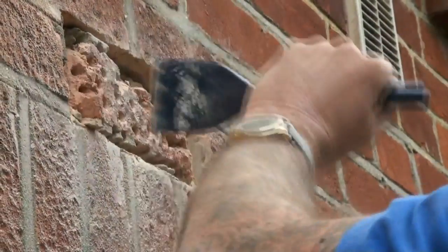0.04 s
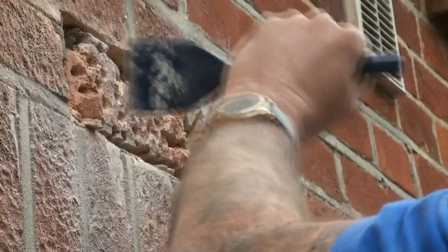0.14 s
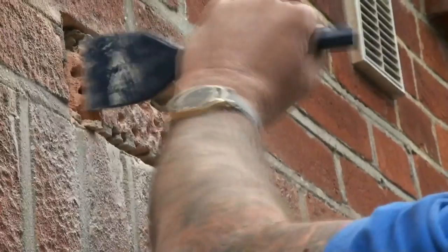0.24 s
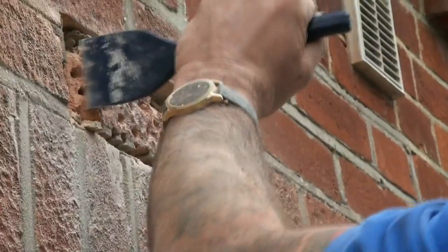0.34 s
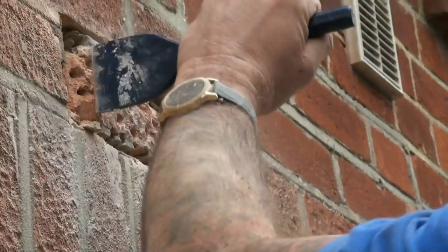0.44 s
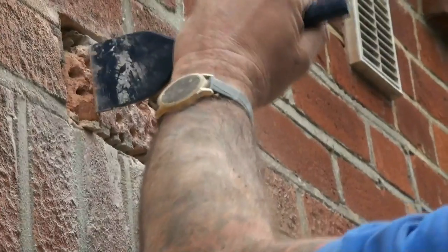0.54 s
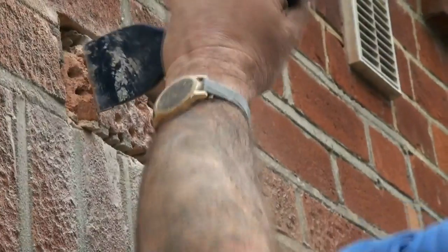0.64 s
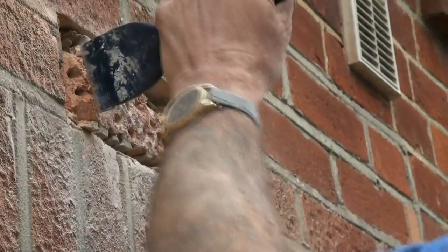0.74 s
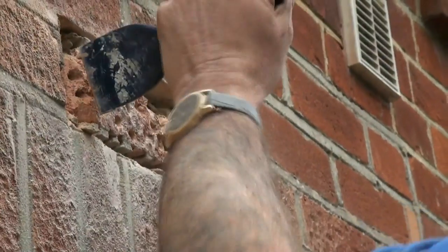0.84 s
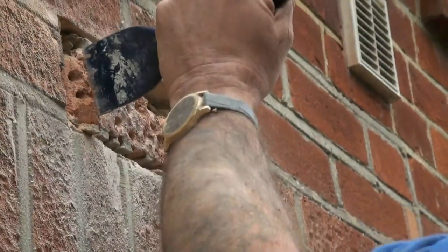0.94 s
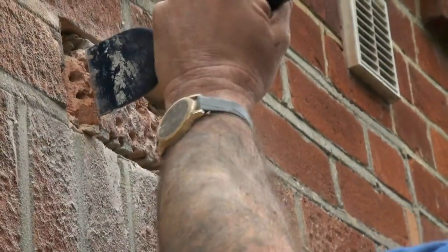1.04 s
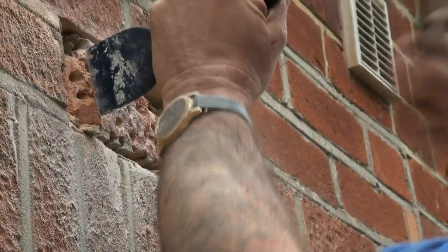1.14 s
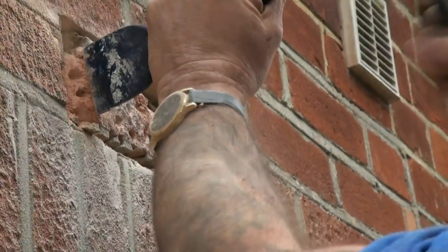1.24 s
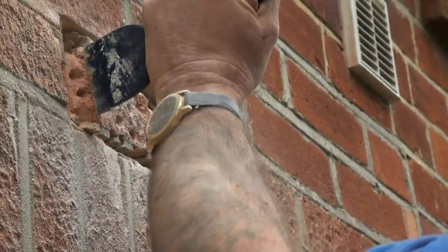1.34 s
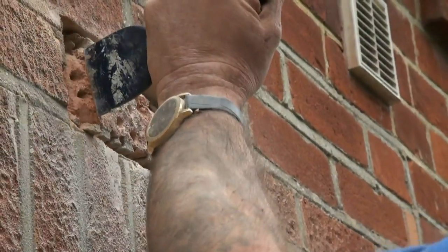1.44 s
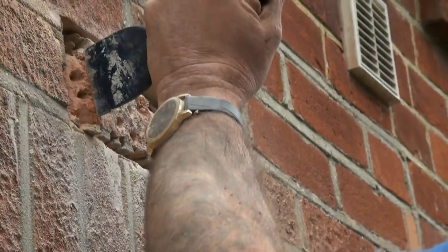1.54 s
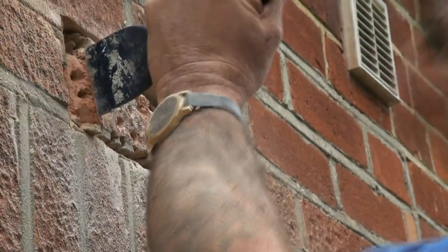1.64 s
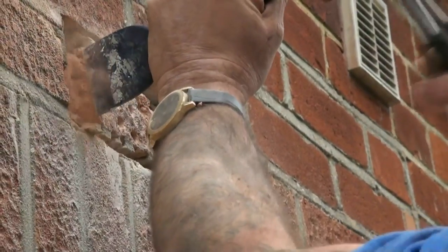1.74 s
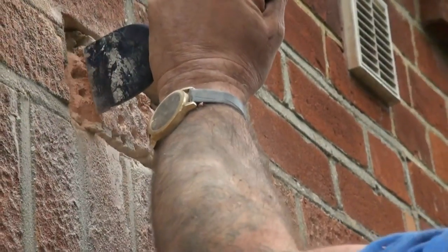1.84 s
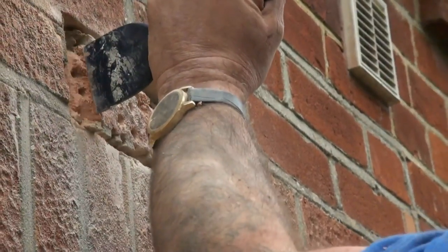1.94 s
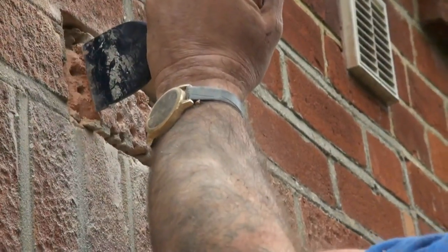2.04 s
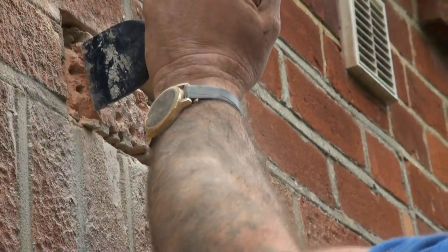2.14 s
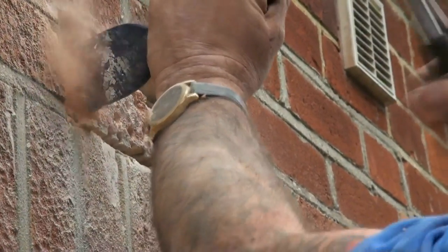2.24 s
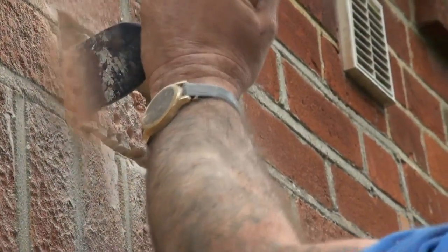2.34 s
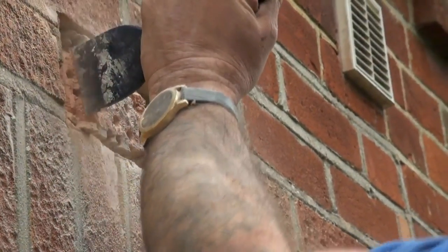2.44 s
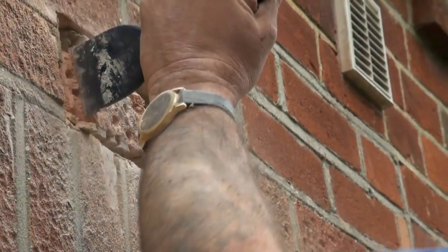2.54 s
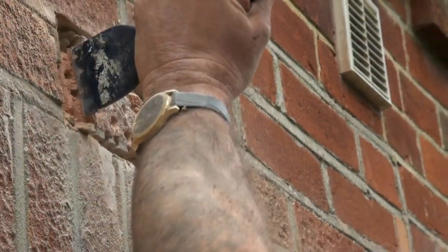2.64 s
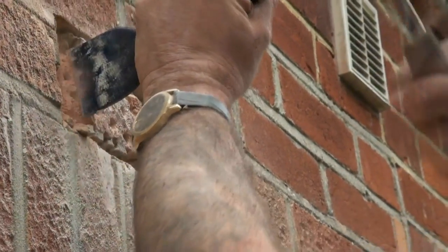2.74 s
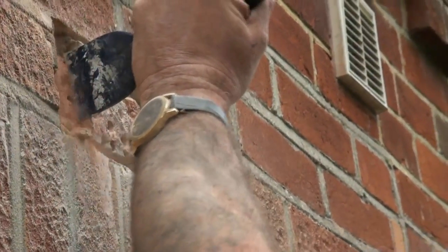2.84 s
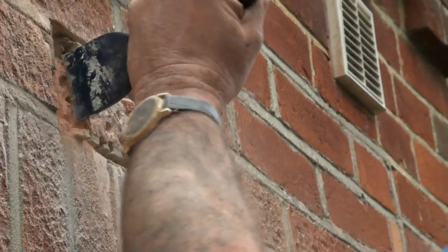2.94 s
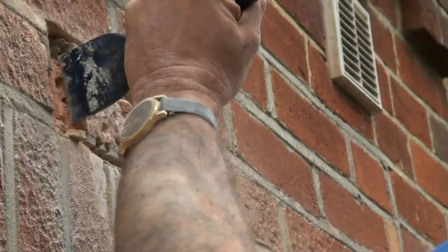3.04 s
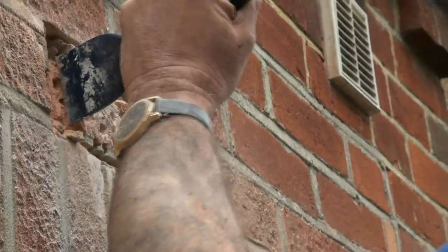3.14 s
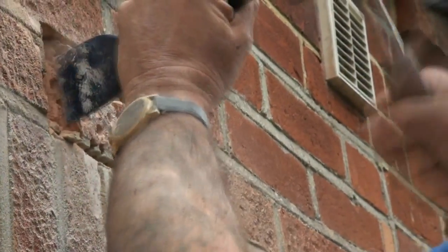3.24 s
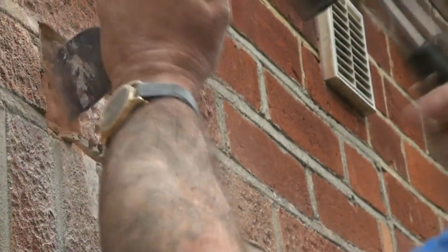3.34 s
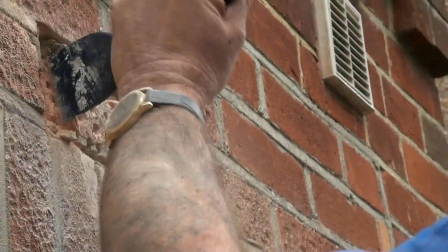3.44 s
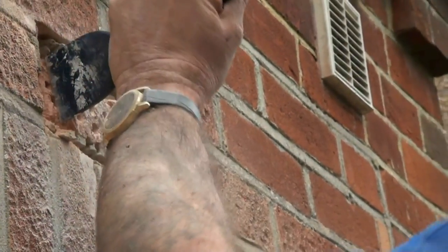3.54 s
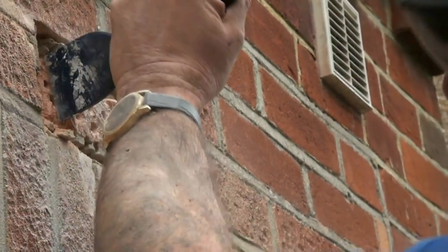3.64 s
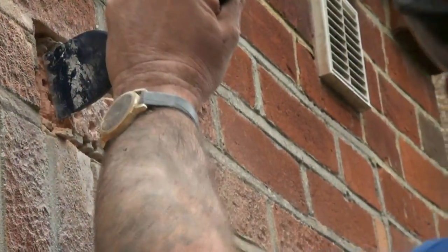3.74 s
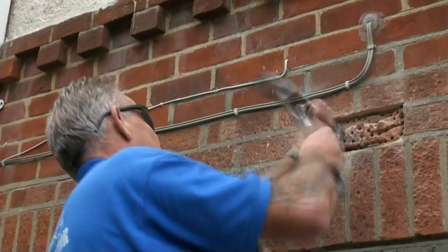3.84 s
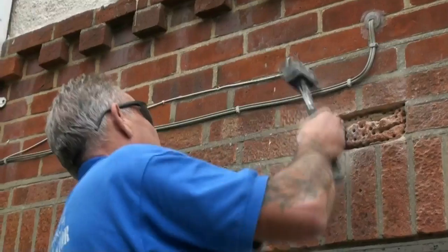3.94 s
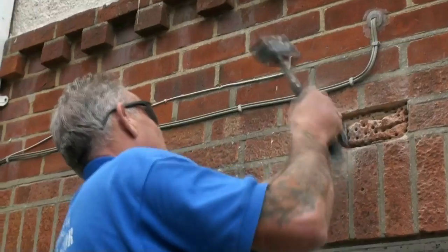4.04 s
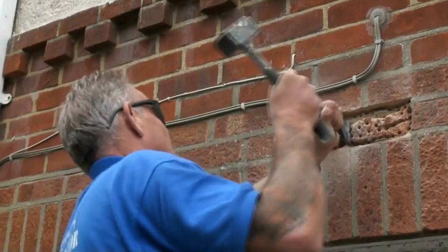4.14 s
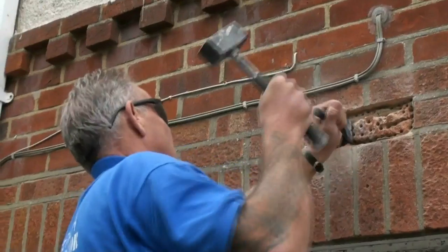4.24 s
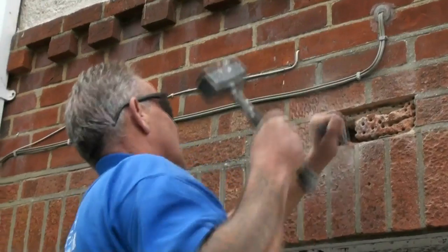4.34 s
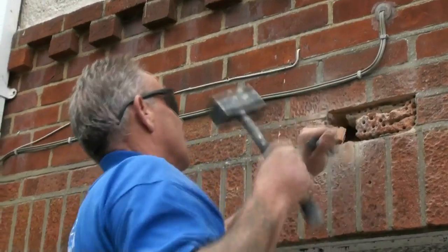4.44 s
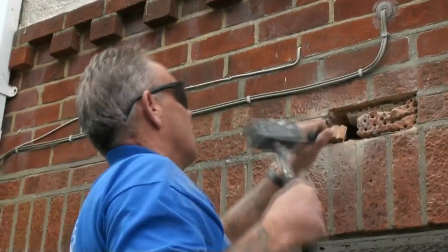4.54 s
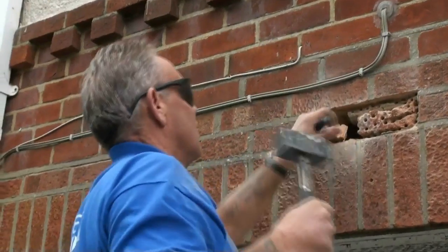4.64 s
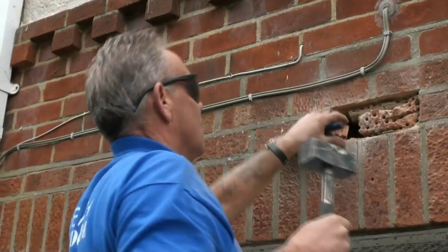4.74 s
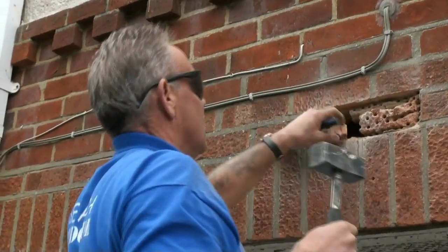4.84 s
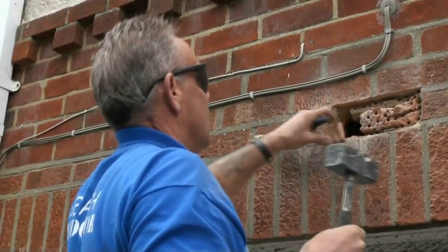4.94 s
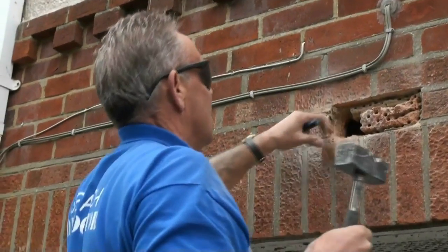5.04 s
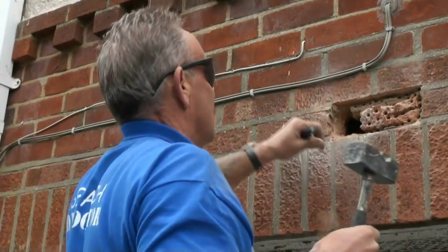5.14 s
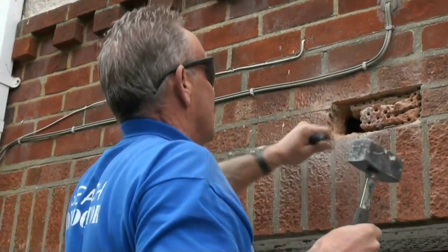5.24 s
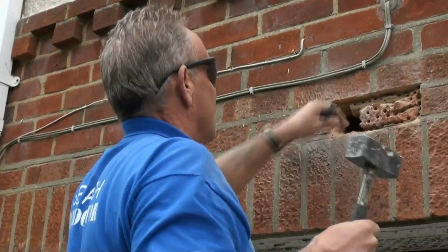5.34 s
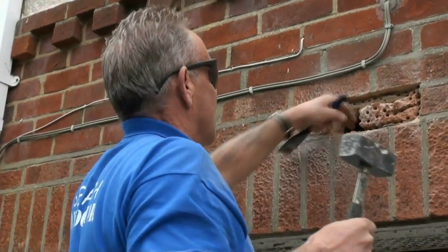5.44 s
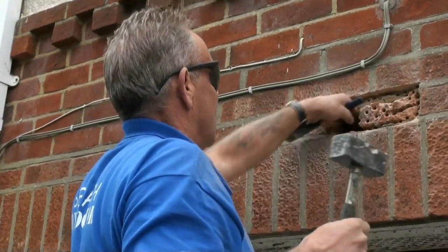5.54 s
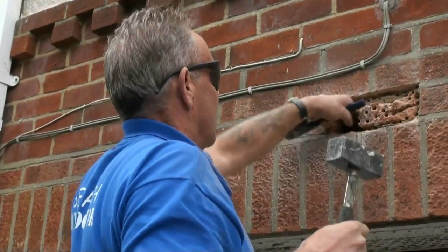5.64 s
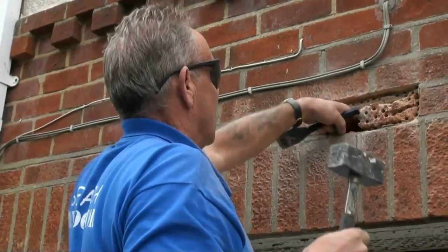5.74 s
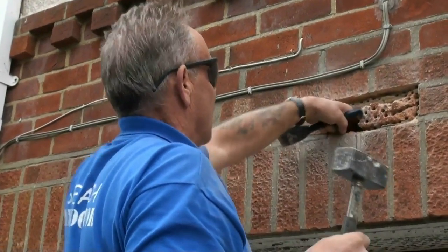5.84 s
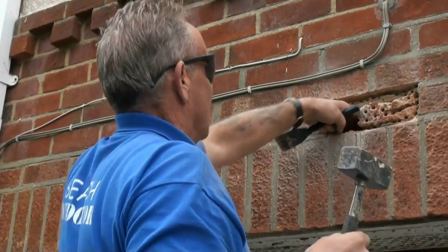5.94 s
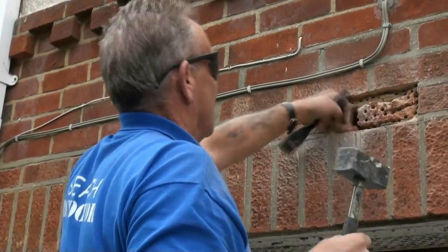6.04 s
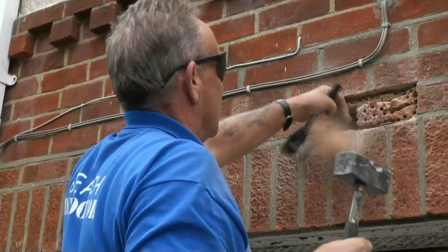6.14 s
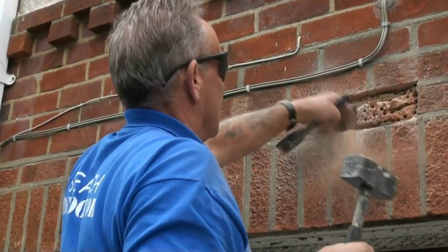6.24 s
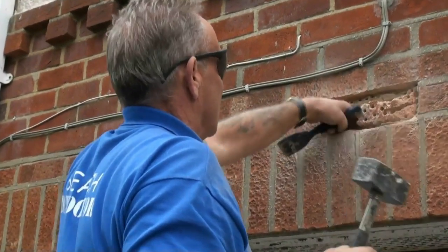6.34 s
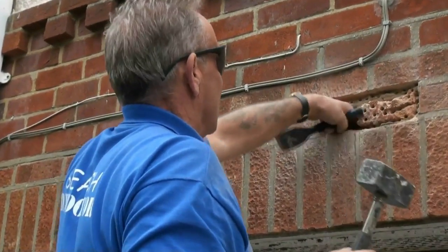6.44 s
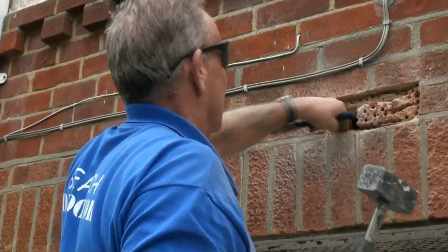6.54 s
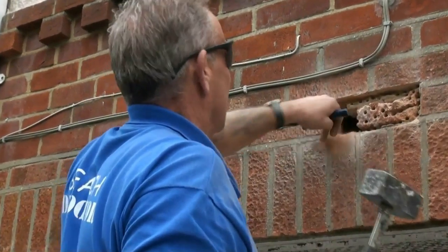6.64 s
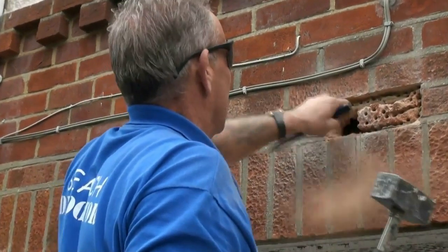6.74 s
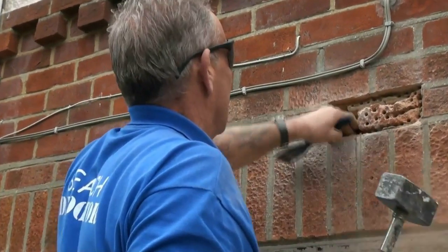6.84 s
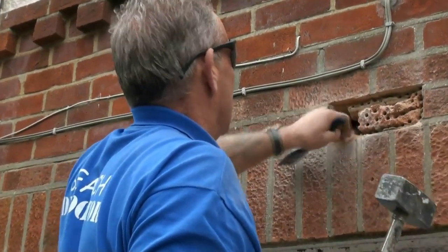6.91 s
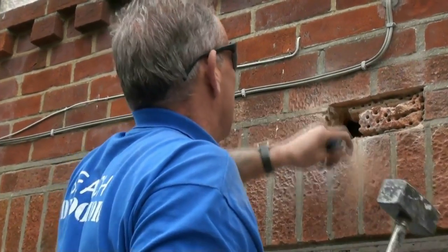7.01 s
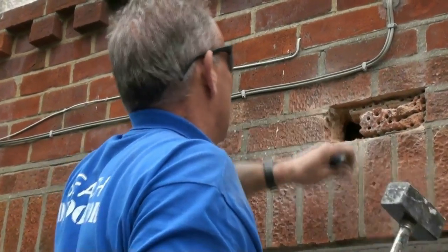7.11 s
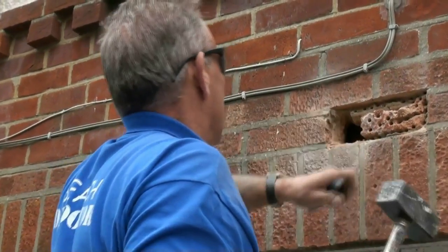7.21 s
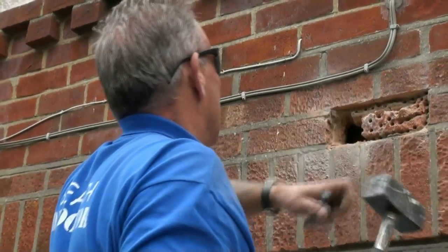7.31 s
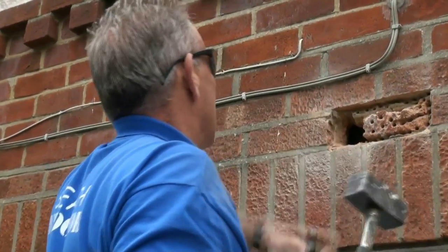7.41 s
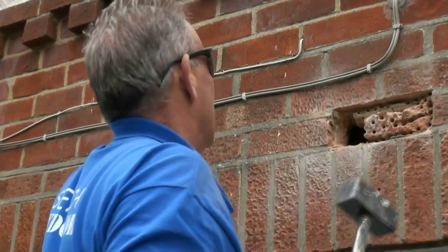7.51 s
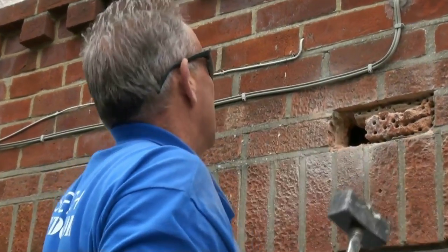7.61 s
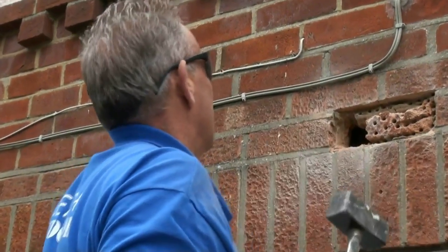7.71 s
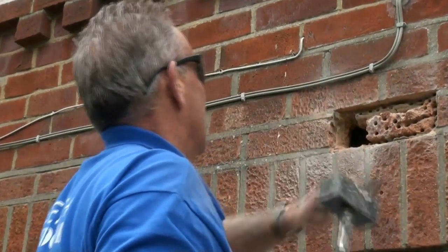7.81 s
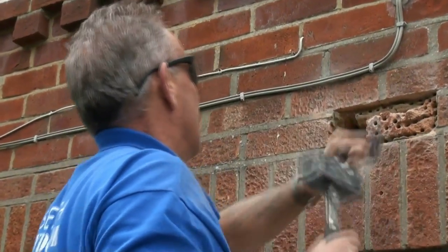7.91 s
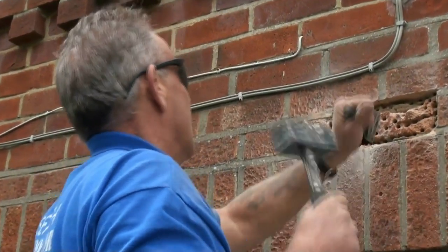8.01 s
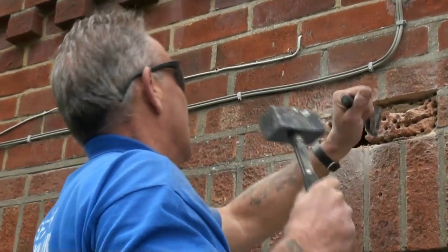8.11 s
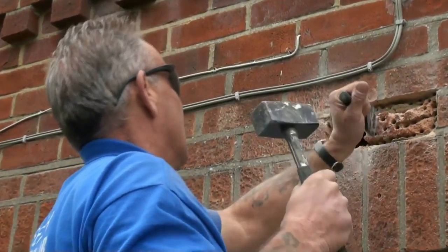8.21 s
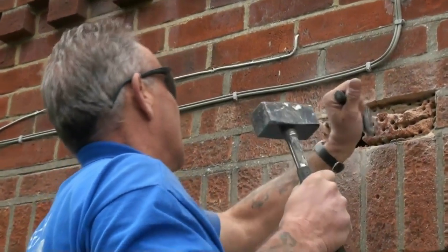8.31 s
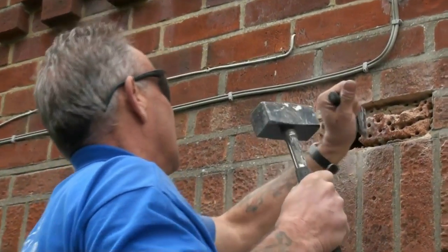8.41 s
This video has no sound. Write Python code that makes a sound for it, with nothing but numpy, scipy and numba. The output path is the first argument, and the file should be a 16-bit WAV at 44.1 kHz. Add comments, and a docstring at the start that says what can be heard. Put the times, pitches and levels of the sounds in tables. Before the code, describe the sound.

A brick yard with faint distant traffic, low wind and a weak engine drone, heard through a small stereo camera microphone. From 0.3 to 1.0 s a steel blade touches and scrapes brick with small dry knocks. Heavy hammer blows on a steel chisel fall at about 1.2, 1.7, 2.3, 2.8, 3.3 and 3.85 s: hard cracks, bright wavering steel ring, low wall boom, crumbling brick and trickling grit, squashed by a limiter. At 3.87 s a pop and momentary dropout cut the last blow; sound returns at 3.9 s with a thinner, brighter metallic ring. Chips patter from 4.1 to 5.7 s, then rubble spills and a lump lands at 5.8 s with a long hollow thud. After a lull, crunchy rubble pours at 6.8 s with a thin steel clink, and again at 7.3 s under a wind swell. It thins to sparse ticks and a dull knock at 8.25 s.

```python
"""In a yard, a club hammer drives a steel bolster into a brick wall: steel rings (wavering sine waves),
the wall booms (low, slower ones) and brick crumbles (filtered random clicks). Then rubble is raked out
and drops: chips are short filtered noise, and one lump lands with a long thud. Far traffic and wind are
shaped noise, an engine a gliding sine. A small camera microphone with a hard limiter listens;
midway the sound pops and drops out for a moment."""
import sys
import numpy as np
from scipy import signal
from scipy.fft import rfft, irfft
from scipy.io import wavfile
from scipy.ndimage import uniform_filter1d, minimum_filter1d
from numba import njit

SR = 44100
rng = np.random.default_rng(int(sys.argv[2]) if len(sys.argv) > 2 else 0)


def wav_record(signal):
    """Record a signal, one row per channel, as 16-bit PCM in the file named by sys.argv[1]."""
    frames = np.transpose(np.atleast_2d(signal))
    bounded = np.clip(frames, -1, 1)
    # unit amplitude maps onto the largest positive 16-bit level
    quanta = np.round(bounded * 32767).astype(np.int16)
    wavfile.write(sys.argv[1], SR, quanta)


N = 373527
T = np.arange(N) / SR  # time in seconds

# Hammer blows. Each row: start in seconds, strength in dB, wall boom in dB, shaft ring in dB,
# head ring in dB, extra crunch above 1 kHz in dB, freest shaft pitch in Hz,
# left minus right in dB, level of the grit knocked loose in dB.
BLOWS = [(1.221, -17.5, -5, -1.5, -15, -0.5, 5500, 2, -54),
         (1.737, -14.5, -3, -1.5, -17.5, 0, 5420, 2, -42.5),
         (2.278, -16.5, -5, -6, -14, 1.5, 5700, 2.2, -44), (2.797, -13, -3, -9, -22.5, 0.5, 5180, 2, -40),
         (3.322, -16.5, -2.5, -9, -24.5, 0, 4860, 1, -43), (3.848, -14, 1, -5.5, -15.5, -1, 5040, 3.5, -60),
         (3.902, -25, -13, 6.5, 2, 9.5, 5800, -1.2, -50)]

POP_S, GAP_S, BACK_S = 3.8740, 3.8779, 3.9012  # seconds: the pop, the dropout, the return
POP_DB, GAP_DB = 12.5, -19  # level change during the pop and the dropout


def undb(db):
    """Turns decibels into a plain multiplier."""
    return 10 ** (np.asarray(db) / 20)


def unit(x):
    """Scales a sound to an average (RMS) level of 1."""
    return x / np.sqrt(np.mean(x ** 2))


def band(x, lo_hz, hi_hz):
    """Keeps mainly the pitches between two limits, along the last axis."""
    sos = signal.butter(2, [lo_hz, min(hi_hz, .45 * SR)], "band", fs=SR, output="sos")
    return signal.sosfilt(sos, x)


def curve(table, column=1):
    """Multiplier over time, read from a dB column of a table whose first column is seconds."""
    table = np.vstack(table)
    return undb(np.interp(T, table[:, 0], table[:, int(column)]))


def fade(t, t60):
    """Steady dying away, down by 60 dB after t60 seconds."""
    return np.exp(-np.log(1000) * t / t60)


def add(out, s, x, pan_db):
    """Mixes one sound into the stereo track at s seconds; pan_db is left minus right."""
    i = int(s * SR)
    x = x[:N - i]
    out[:, i:i + len(x)] += x * undb([[pan_db / 2], [-pan_db / 2]])


def side_db(s):
    """Left minus right in dB: a little left before the dropout, a little right after it."""
    return 1.6 if s < GAP_S else -1.2


def spread(x, width):
    """Stereo from a shared stream and an unrelated stretch of it in opposed phase."""
    return x + width * np.roll(x, len(x) // 3) * np.array([[1], [-1]])


def grains(per_s, spread_db, count):
    """Random clicks of very uneven size, over count samples."""
    chance = rng.random((3, count))
    clicks = chance[0] < per_s / SR
    sign = np.sign(chance[1] - .5)
    size = undb(-spread_db * np.log(1 - chance[2]))
    return unit(clicks * sign * size)


def ring(modes, scatter_db, rough_hz, clean):
    """One strike of a set of ringing pitches; gritty contact makes each waver in size and phase."""
    hz, db, t60 = np.transpose(modes)[..., None]
    t, hold = T[:SR // 2], int(SR / rough_hz)
    # random steps, rough_hz of them a second, then smoothed
    steps = rng.standard_normal((2, len(modes), len(t) // 40))
    waver = np.repeat(steps, hold, 2)[..., :len(t)]
    sine_waver, cosine_waver = 1.79 * uniform_filter1d(waver, hold)
    weight = undb(db + scatter_db * rng.standard_normal(hz.shape)) * fade(t, t60)
    angle = 2 * np.pi * hz * t
    return np.sum(weight * ((clean + sine_waver) * np.sin(angle) + cosine_waver * np.cos(angle)), 0)


def rumble(bands, burst):
    """Broad bands of one gritty burst, each dying at its own rate."""
    t = T[:len(burst)]
    return sum(undb(db) * unit(band(burst, hz / 1.436, hz * 1.424)) * fade(t, t60)
               for hz, db, t60 in bands)


def blows():
    """Each blow cracks brick and sets wall, bolster shaft and hammer head ringing."""
    # Wall and cavity. Each row: pitch in Hz, level in dB, time to die by 60 dB in seconds.
    wall_modes = [(90.8, -8, 0.45), (142, 1, .33), (208, -2, 0.36), (336, 2, 0.23), (459.5, 0, 0.2),
                  (582, 2, .2), (758, -9.5, 0.19)]
    # Steel shaft of the bolster. Each row: pitch in Hz, level in dB, time to die by 60 dB in seconds.
    shaft_modes = [(3670, 2, .22), (4355, -3, 0.3), (4860, -9.5, 0.44), (5230, -8.5, 0.46),
                   (5400, -6, 0.34), (5800, -5, 0.3), (6340, -7, 0.43), (6900, -10, .3)]
    # Hammer head. Each row: pitch in Hz, level in dB, time to die by 60 dB in seconds.
    head_modes = [(7840, -11.5, 0.39), (8900, -2, 0.13), (9600, -6.5, 0.24), (10340, -7.5, 0.19),
                  (10780, 1, 0.19), (11900, -7, 0.3), (11400, -8.5, 0.26), (12100, -9, 0.17),
                  (12500, -21, 0.17)]
    # Crack and crumbling of the brick. Each row: middle of the band in Hz, level in dB,
    # time to die by 60 dB in seconds.
    crush_bands = [(183.6, 2.5, 0.35), (337, 2.5, 0.34), (717, 2.5, .28), (1836, 2.5, .3), (2960, 0, 0.28),
                   (5630, -2.5, 0.3), (9150, -7.5, 0.2), (12500, -13, 0.2)]
    out, t = np.zeros((2, N)), T[:SR // 2]
    for s, db, wall_db, shaft_db, head_db, crunch_db, free_hz, pan_db, _ in BLOWS:
        bands = [(hz, d + crunch_db * (hz > 1000), t60) for hz, d, t60 in crush_bands]
        crush = rumble(bands, grains(20000, 1.27, count=len(t)))
        # the heavy wall takes a while to move: time constant 22 ms
        boom = ring(wall_modes, 2.1, 66, .5) * (1 - np.exp(-t / 0.022))
        # the grip shifts from blow to blow and weakens pitches by 28 dB per octave away from the freest
        held = [(hz, d - 28 * abs(np.log2(hz / free_hz)), t60) for hz, d, t60 in shaft_modes]
        shaft = undb(shaft_db) * ring(held, 1.8, 450, .25)
        head = undb(head_db) * ring(head_modes, 3.5, 400, .3)
        # a blow still ringing when the dropout begins stops there
        alive = (s > GAP_S) | (s + t < GAP_S)
        add(out, s, undb(db) * (crush + undb(wall_db) * boom + shaft + head) * alive, pan_db)
    return out


def taps(table, modes, scatter_db, rough_hz, clean):
    """Repeated strikes of one ringing object."""
    out = np.zeros((2, N))
    for s, db in table:
        add(out, s, undb(db) * ring(modes, scatter_db, rough_hz, clean), side_db(s))
    return out


def blade_touches():
    """The steel blade touches brick and sings at its own pitches."""
    # Touches of the blade. Each row: start in seconds, level in dB.
    touch_times = [(.31, -54), (.40, -58), (.425, -57), (.465, -60), (.95, -62), (1.015, -59.5),
                   (4.385, -58), (6.415, -64.5), (8.25, -66)]
    # Ringing of the blade. Each row: pitch in Hz, level in dB, time to die by 60 dB in seconds.
    blade_modes = [(3080, -10, .12), (6060, 2, .06), (6260, -4, 0.085), (7640, -2, 0.098), (10770, -1, .14),
                   (14560, -21, 0.17)]
    return taps(touch_times, blade_modes, 3.1, 110, 0.44)


def thin_clinks():
    """Thin steel clinks during the raking, with high, short-lived pitches."""
    # Clinks. Each row: start in seconds, level in dB.
    clink_times = [(6.812, -36.5), (7.00, -53), (7.085, -58), (7.72, -57.5)]
    # Ringing of the thin steel. Each row: pitch in Hz, level in dB, time to die by 60 dB in seconds.
    thin_modes = [(9800, -6, .12), (10530, -0.5, 0.17), (10400, -4, 0.1), (12000, -4, 0.11),
                  (12690, -21, .1), (14970, -20, .1)]
    return taps(clink_times, thin_modes, 1.7, 90, .6)


def lump():
    """A lump of brick crashes on hollow ground: the boom builds fast, then each band dies in its own time."""
    # Boom of the ground. Each row: middle of the band in Hz, level in dB, time to die by 60 dB in seconds.
    ground_bands = [(105, -12, 0.69), (169.5, -2, 0.98), (292, 2.5, 1.43), (522, 4, 0.96), (964, -.5, 0.61),
                    (1880, -11, 0.88), (3500, -16, .5)]
    out, t = np.zeros((2, N)), T[:SR]
    build = 1 - np.exp(-(t / 0.011) ** 2)
    boom = rumble(ground_bands, grains(20000, 1.7, count=SR)) * build
    add(out, 5.814, undb(-27) * boom, -1.3)
    return out


def pours():
    """Handfuls of rubble pour down: dense crunching that starts at once and thins out."""
    # Pours. Each row: start in seconds, level in dB, time to die by 60 dB in seconds.
    pour_times = [(1.424, -41, .2), (1.942, -38, .22), (5.678, -39.5, 0.53), (5.93, -52, 0.56),
                  (6.766, -31.5, 0.79), (7.286, -33.5, 0.95)]
    # Colour of the rubble. Each row: middle of the band in Hz, level in dB.
    rubble_bands = [(700, -3.5), (1400, 0.5), (2800, -3), (5600, -6), (11000, -14.5)]
    out = np.zeros((2, N))
    for s, db, t60 in pour_times:
        bands = [(hz, d, t60) for hz, d in rubble_bands]
        crunch = rumble(bands, grains(3500, 2.1, count=SR // 2))
        add(out, s, undb(db) * crunch, side_db(s))
    return out


def chips(level, base_t60=0.046):
    """Brick chips: a sharp contact, a short stony ring, a broad knock, a low thump and a bright tick."""
    # Chips knocked or landing. Each row: start in seconds, level in dB, pitch in Hz.
    chip_hits = [(0.301, -46, 2500), (0.31, -35, 1400), (0.358, -43, 1620), (0.439, -43.5, 1790),
                 (0.495, -45.5, 1850), (1.015, -47, 829), (1.431, -42, 1550), (1.46, -45, 1550),
                 (1.949, -39, 1570), (2.023, -40.5, 3110), (2.102, -43, 900), (2.493, -28, 760),
                 (2.532, -30.5, 1000), (2.702, -37, 1400), (2.983, -34, 861), (3.07, -39, 910),
                 (3.495, -31, 590), (3.529, -35, 920), (4.119, -32, 1170), (4.179, -32.5, 920),
                 (4.212, -38, 918), (4.254, -39, 1200), (4.329, -41.5, 783), (4.356, -38, 1040),
                 (4.626, -44, 818), (4.667, -45, 3200), (4.746, -34, 1320), (4.79, -45, 1200),
                 (4.815, -35, 860), (4.835, -38.5, 2350), (4.915, -40, 1520), (4.971, -34, 1740),
                 (5.02, -36, 1110), (5.05, -49, 1680), (5.116, -39.5, 1380), (5.144, -37, 677),
                 (5.16, -34.5, 1490), (5.428, -37, 2000), (5.536, -36, 2620), (5.58, -31.5, 1210),
                 (5.597, -30, 1240), (5.644, -38.5, 3200), (5.667, -36.5, 1700), (5.676, -31, 700),
                 (6.405, -44, 780), (6.769, -28, 1140), (6.814, -34, 1640), (6.85, -28.5, 970),
                 (6.917, -36.5, 1200), (6.929, -31, 1620), (6.959, -41.5, 1400), (7.017, -41.5, 1560),
                 (7.081, -39, 1450), (7.152, -44.5, 1320), (7.207, -44.5, 982), (7.285, -30, 744),
                 (7.293, -28, 1740), (7.331, -32.5, 1800), (7.349, -33, 1660), (7.4, -33.5, 1370),
                 (7.445, -36, 1380), (7.619, -42.5, 1650), (7.736, -39, 1170), (8.249, -47, 650),
                 (8.458, -45, 1500)]
    # Dull thumps of heavier contact. Each row: start in seconds, level in dB.
    heavy_hits = [(0.31, -19), (1.949, -19), (2.983, -18), (3.495, -19), (3.529, -17), (5.144, -28),
                  (5.676, -23), (6.769, -25), (7.285, -28), (8.249, -18)]
    # Tiny splinters that ping off, all treble. Each row: start in seconds, level in dB.
    splinter_hits = [(0.249, -30), (0.696, -42.5), (1.694, -50), (2.102, -26.5), (2.22, -45.5),
                     (2.62, -41.5), (2.712, -31), (2.733, -38), (3.07, -33), (5.597, -35), (5.676, -36),
                     (6.662, -41), (6.696, -47.5), (6.767, -29), (7.207, -40.5)]
    knock_db, thump_db, tick_db = -5.5, -5, -18  # added to the stony ring of every chip
    out, t = np.zeros((2, N)), T[:SR // 8]
    hit = 1 + 1.25 * np.exp(-t / 0.0014)  # extra force in the first moment

    def contact():
        """Noise of two rough surfaces meeting, strongest at first."""
        return rng.standard_normal(len(t)) * hit

    def thump(noise):
        """Low, longer part of the contact."""
        return band(noise, 290, 510) * fade(t, 3.8 * base_t60)

    def tick(noise):
        """Bright, short part of the contact."""
        return band(band(noise, 4900, 14400), 7900, 14400) * fade(t, 0.7 * base_t60)

    def burst(noise, envelope):
        """Dying noise with its level set by hit and envelope, whatever the band."""
        return unit(noise * envelope) * np.sqrt(np.mean((hit * envelope) ** 2))

    for s, db, hz in chip_hits + crumbs(level):
        noise = contact()
        stone = burst(band(noise, hz / 1.55, hz * 1.5), fade(t, 1.55 * base_t60))
        knock = burst(band(band(noise, 470, 5360), 370, 3820), fade(t, 1.1 * base_t60))
        parts = stone + undb(knock_db) * knock
        parts = parts + undb(thump_db) * thump(noise) + undb(tick_db) * tick(noise)
        add(out, s, undb(db) * parts, side_db(s))
    for s, db in heavy_hits:
        add(out, s, undb(db) * thump(contact()), side_db(s))
    for s, db in splinter_hits:  # they fly to either side
        add(out, s, undb(db) * tick(contact()), side_db(s) + 6.0 * rng.standard_normal())
    return out


def crumbs(level, count=80, low_hz=750, high_hz=3300):
    """Small chips at random, more and louder where more grit moves: seconds, dB and pitch in Hz."""
    when, size, pitch = rng.random((count, 3)).T
    share = np.cumsum(np.sqrt(level))
    s = np.interp(when, share / share[-1], T)
    grit_db = 20 * np.log10(np.interp(s, T, level))
    db = grit_db - 2 - 2.5 * np.log(1 - size)  # a few come out much louder
    return list(zip(s, db, low_hz * (high_hz / low_hz) ** pitch))


def loose():
    """Level of moving grit: what the blade scrapes and rakes, plus what each blow shakes loose."""
    # Grit scraped by the blade and raked out of the hole. Each row: time in seconds, level in dB.
    raking_levels = [(0.0, -55), (0.5, -51), (0.76, -58), (1.2, -68), (3.88, -68), (3.91, -38), (4.1, -50),
                     (4.63, -59), (4.98, -52), (5.3, -60), (5.55, -57), (5.8, -45), (6.16, -65),
                     (6.76, -60), (6.8, -43), (7.26, -53), (7.3, -45), (7.7, -50), (8.04, -66)]
    fall_s, trickle_db_per_s = .16, 22  # full flow comes this long after a blow, then thins out
    power = curve(raking_levels) ** 2
    for s, *_, grit_db in BLOWS:
        late = T - s - fall_s
        heard = (s > GAP_S) | (T < GAP_S)  # grit from earlier blows stops at the dropout
        arrives = np.clip((T - s) / fall_s, 0, 1) ** 2 * heard
        power = power + (arrives * undb(grit_db - trickle_db_per_s * np.maximum(late, 0))) ** 2
    return np.sqrt(power)


def grit(level):
    """Coarse crumbs crackle in the mids, dust fizzes above; both come in small spills."""
    steps = np.repeat(rng.standard_normal(N // 400 + 1), 400)[:N]
    spills = undb(2.87 * uniform_filter1d(steps, size=150))
    coarse = spread(unit(band(grains(6000, 2.0, count=N), 346, 4000)), .35)
    dust = spread(unit(band(grains(12000, 1.9, count=N), 4800, 10900)), 0.71)
    return spills * level * (coarse + undb(-10) * dust)


def traffic():
    """Far traffic: steady noise whose tone is shaped pitch by pitch."""
    # Tone of the traffic. Each row: frequency in Hz, relative level in dB per Hz.
    town_tone = [(35, -23), (60, -1), (217, -2), (651, -7), (842, -6), (1470, -8.5), (2470, -20),
                 (6140, -25), (11000, -40.5), (16000, -48)]
    corner_hz, tone_db = np.transpose(town_tone)
    hz = np.maximum(np.fft.rfftfreq(2 ** 19, 1 / SR), 1)
    shape = undb(np.interp(np.log(hz), np.log(corner_hz), tone_db))
    noise = irfft(rfft(rng.standard_normal(2 ** 19)) * shape)[:N]
    return undb(-54.5) * spread(unit(noise), 0.23)


def wind():
    """Wind rumble: low noise that swells and sinks."""
    # Strength of the wind. Each row: time in seconds, level in dB.
    wind_levels = [(0.0, -58), (0.78, -76), (1.32, -56), (3.86, -58), (3.9, -50), (4.9, -55), (5.64, -64.5),
                   (5.97, -63), (6.44, -57), (7.17, -41), (7.69, -62.5), (8.47, -52)]
    return curve(wind_levels) * spread(unit(band(rng.standard_normal(N), 24, 143)), 0.44)


def engine():
    """A far engine drones: one sine wave, gliding in pitch."""
    # Drone of the engine. Each row: time in seconds, pitch in Hz, level in dB.
    drone_glide = [(0.0, 56, -53), (.25, 48, -57), (.55, 42, -72), (2.2, 42, -75), (2.5, 43, -62),
                   (3.1, 48, -57), (3.86, 56, -54), (3.9, 57, -80), (7.3, 57, -75), (7.7, 59, -59),
                   (8.47, 61, -58)]
    hz = np.interp(T, *np.transpose(drone_glide)[:2])
    return curve(drone_glide, column=2) * unit(np.sin(2 * np.pi * np.cumsum(hz) / SR))


def yard(x, t60=0.33, treble_t60=0.23):
    """Walls and paving return a diffuse tail, shorter and wider in the treble."""
    t = T[:SR // 2]
    # the first reflections take 4 ms
    low, high = (spread(rng.standard_normal(len(t)), width) * (t > .004) for width in (.6, .95))
    tail = band(low, 72, 2780) * fade(t, t60)
    tail = tail + band(band(high, 2900, 15600), 2400, 18000) * fade(t, treble_t60)
    tail = tail / np.sqrt(np.sum(tail ** 2) / 2)
    return signal.oaconvolve(x.mean(0)[None], tail, axes=1)[:, :N]


def scene():
    """Near sounds with their echo in the yard, then the moving grit and the far background."""
    level = loose()
    near = blows() + blade_touches() + thin_clinks() + lump() + pours() + chips(level)
    # the highest treble bends round the camera body and reaches the two ports by unlike paths
    treble = np.roll(band(near.mean(0), 8500, 17000), int(.0006 * SR))
    near = near + .55 * treble * np.array([[1], [-1]])
    return near + undb(-7.0) * yard(near) + grit(level) + traffic() + wind() + engine()


@njit
def follow(x, release):
    """Peak follower: jumps up, sinks slowly."""
    e, out = 0., np.empty(len(x))
    for i in range(len(x)):
        e = max(x[i], e * release)
        out[i] = e
    return out


def record(dry, ceiling_db=-16.0, release_s=0.11, ahead_s=0.0013):
    """A look-ahead limiter flattens the blows; the level leaps, drops out and returns; the top is cut."""
    ahead = int(ahead_s * SR) + 1
    peak = -minimum_filter1d(-np.abs(dry).max(0), 2 * ahead + 1)  # loudest sample nearby
    held_peak = follow(peak, np.exp(-1 / (release_s * SR)))
    gain = np.minimum(1, undb(ceiling_db) / (held_peak + 1e-9))
    gain = uniform_filter1d(gain, ahead)
    jump_db = np.where(T < POP_S, 0, np.where(T < GAP_S, POP_DB, np.where(T < BACK_S, GAP_DB, 0)))
    x = dry * gain * uniform_filter1d(undb(jump_db), size=9)
    # steep cut above 15900 Hz
    return signal.sosfilt(signal.ellip(10, .2, 70, 15900, fs=SR, output="sos"), x)


dry = scene()
out = record(dry)
wav_record(out)
```